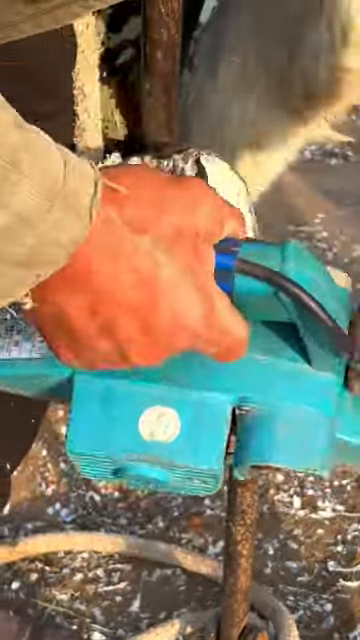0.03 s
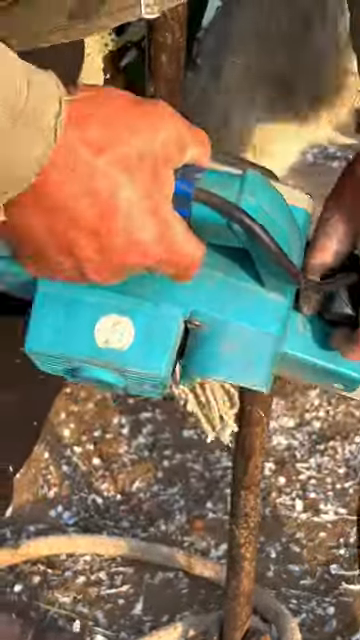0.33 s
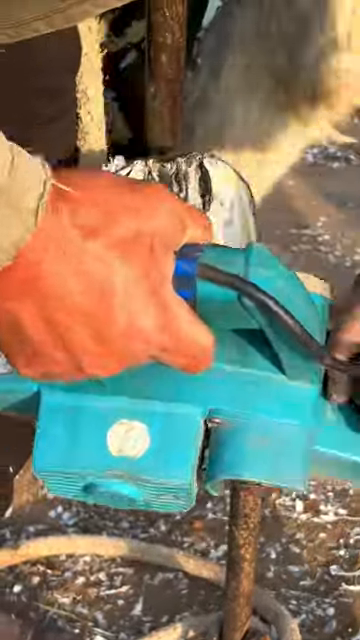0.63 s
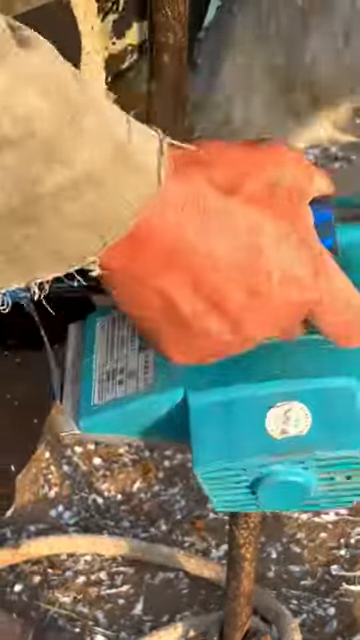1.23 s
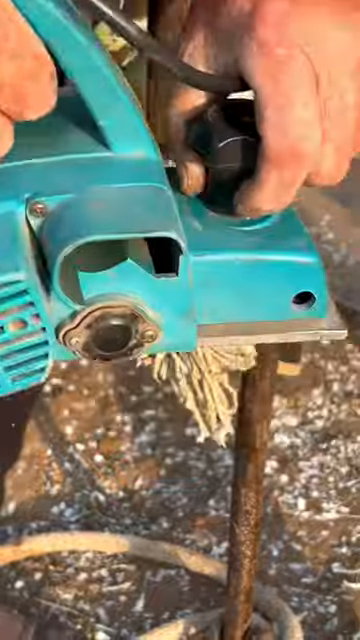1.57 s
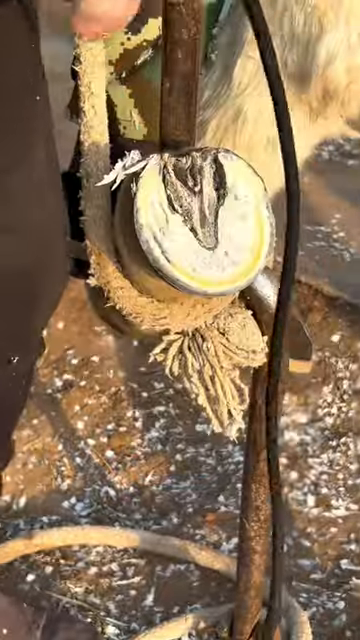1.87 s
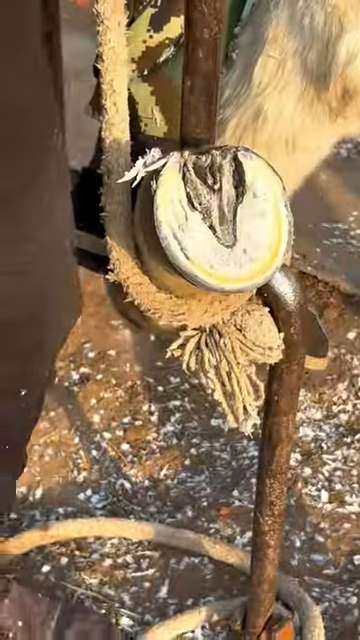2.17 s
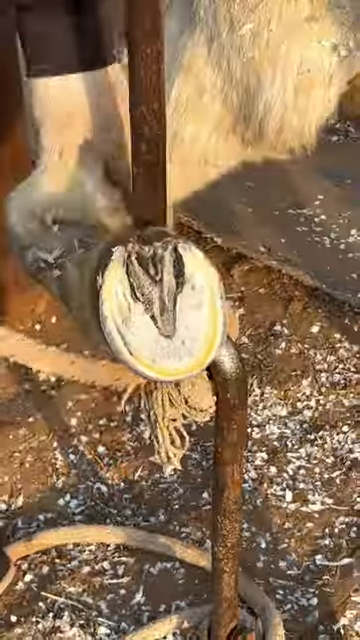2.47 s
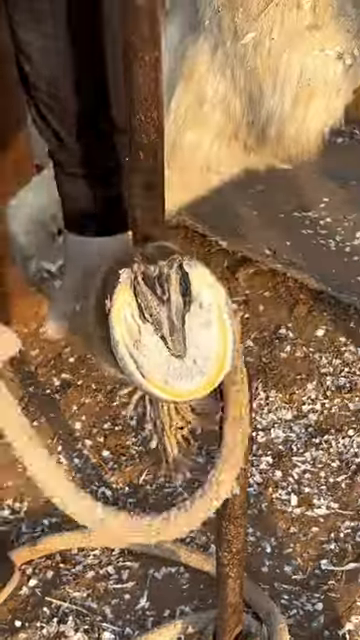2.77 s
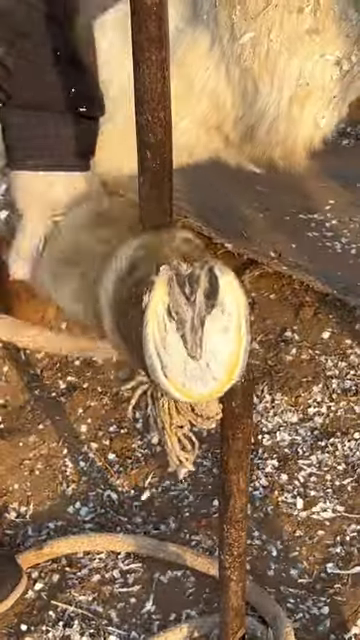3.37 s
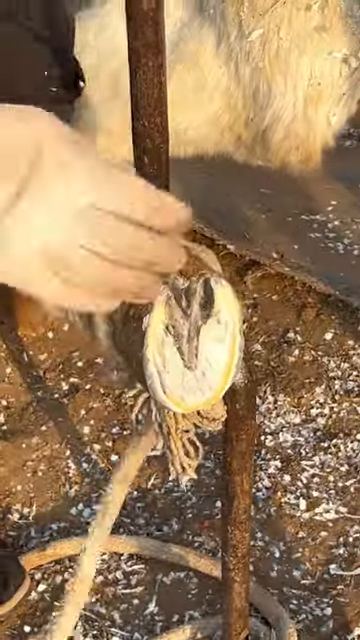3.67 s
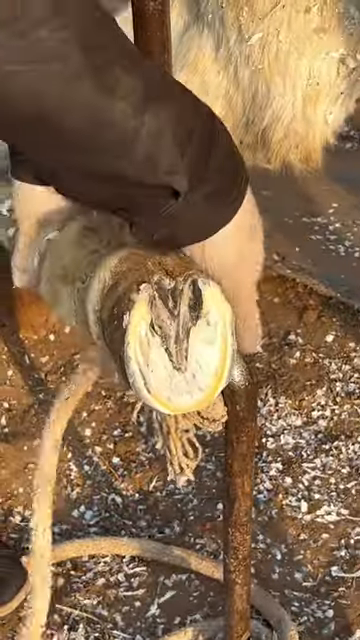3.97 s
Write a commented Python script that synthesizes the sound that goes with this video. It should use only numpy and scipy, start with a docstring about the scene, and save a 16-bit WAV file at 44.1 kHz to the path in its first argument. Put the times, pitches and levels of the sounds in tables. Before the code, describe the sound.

An electric planer whines, bites a hoof twice and cuts off, leaving wind buffeting the microphone.

```python
"""An electric hand planer runs close by, its blades chopping the air over the whistle of its fan, while
wind buffets the microphone throughout. Twice the blades bite into a hoof, and each load slows the drum.
Lifted clear, the planer speeds up, then coasts until its sound cuts off. In the quiet yard a small bird
peeps far away, a rope rubs as it is handled, and a steel fitting clanks and rings."""
import sys
import numpy as np
from scipy import signal
from scipy.fft import rfft, irfft, next_fast_len
from scipy.io import wavfile
from scipy.ndimage import map_coordinates

SR = 44100
rng = np.random.default_rng(int(sys.argv[2]) if len(sys.argv) > 2 else 0)


def store_pcm(level_fs):
    """Save levels as 16-bit WAV."""
    pcm = np.round(np.clip(level_fs, -1, 1) * 32767).astype(np.int16)
    wavfile.write(sys.argv[1], SR, np.atleast_2d(pcm).T)


N = 176400

# Speed of the cutter drum. Each row: time in seconds, blade rate in Hz.
BLADE_RATE = [(0, 443.5), (.16, 462.4), (.36, 475), (.42, 431), (.58, 460.2), (.8, 479), (.985, 487.3),
              (1.03, 427.8), (1.27, 469.3), (1.6, 490), (1.8, 495), (2, 471.9), (2.44, 417)]
# The planer turned in the hands. Each row: time in seconds, then blade tone, overtones, rush, hiss in dB.
PLANER_LEVELS = [(0, -31, -33, -29.5, -30.5), (.3, -34.5, -25.5, -30.5, -28.5),
                 (.46, -27.5, -33.5, -29.5, -29.5), (.93, -36, -24.5, -29, -28.5),
                 (1.08, -30, -34, -30, -32), (1.48, -28, -27, -27, -27), (1.78, -24.5, -27.5, -27, -23.5),
                 (2, -32, -28, -33, -28), (2.25, -38, -39, -39, -33), (2.44, -50, -40.5, -39.5, -35.5)]
# Drum and belt overtones. Each row: multiple of the blade rate, relative level in dB, roughness 0 to 1.
OVERTONES = [(1.5, -16, 0.8), (2, -6, 0.4), (2.33, -13.5, .8), (2.55, -17.5, 0.2), (2.82, -15.5, .4),
             (3, -3.5, 0.4), (3.5, -20.5, 0.4), (4, -15, 0.05), (5, -20.5, 0.2), (6.94, -16, 0.2)]
# The motor fan's whistle. Each row: time in seconds, frequency in Hz, level in dB.
FAN_WHISTLE = [(0, 5360, -37), (1.1, 5420, -42), (1.3, 5483, -28), (1.78, 5568, -28), (2, 5205, -37),
               (2.44, 4650, -44)]
# Air noise of drum, fan and chip port. Each row: frequency in Hz, relative density in dB.
RUSH_SPECTRUM = [(100, -78), (400, 3), (780, 0), (1100, 2), (1450, 4), (2500, -4), (3100, -7.5),
                 (3700, -12), (6000, -16.5)]
FAN_SPECTRUM = [(1500, -21.5), (3000, 0), (3900, 1), (5400, 1), (8000, -5.5), (11000, -8), (13800, -7),
                (15800, -33.5)]
PORT_SPECTRUM = [(2000, -45), (4100, -6), (4650, 15.5), (6300, -6.5), (15000, -51.5)]
# Strength of the wind's rumble. Each row: time in seconds, level in dB.
RUMBLE_LEVELS = [(0, -59.5), (.35, -39.5), (.7, -46), (1.9, -35), (2.65, -31.5), (3.1, -29.5),
                 (3.35, -42.5), (3.4, -30.5), (3.57, -29.5), (3.72, -54.5), (3.8, -35.5), (3.88, -48),
                 (3.99, -35)]
# Gusts. Each row: centre in seconds, half length in seconds, level in dB.
WIND_GUSTS = [(2.264, 0.33, -38.5), (2.479, 0.0089, -28), (2.515, 0.023, -31), (2.597, 0.021, -28.5),
              (2.642, .01, -32), (2.743, 0.022, -38), (2.787, 0.02, -30.5), (2.849, 0.034, -28.5),
              (2.946, .009, -24.5), (3.013, 0.022, -26), (3.071, 0.042, -31), (3.209, 0.0085, -35.5),
              (3.398, 0.013, -34), (3.437, 0.017, -30.5), (3.526, 0.041, -31.5), (3.621, 0.01, -37.5),
              (3.931, .009, -33.5)]
# Low thumps of wind. Each row: centre in seconds, level in dB, frequency in Hz.
WIND_THUMPS = [(2.472, -17, 130), (2.892, -24, 100), (3.969, -26, 83.5)]
# Wind and background noise. Each row: frequency in Hz, relative density in dB.
RUMBLE_SPECTRUM = [(22, -36.5), (50, 1), (180, 0.5), (290, -5), (420, -25.5), (2000, -79)]
FLUTTER_SPECTRUM = [(120, -19), (280, 2.5), (450, 0.5), (850, -13.5), (1200, -32), (4000, -92.5)]
YARD_SPECTRUM = [(60, 10), (1200, 0), (2700, -6.5), (3600, -8), (5500, -13), (15000, -20)]
FAR_HISS_SPECTRUM = [(2600, -1), (3500, 7.5), (8000, -12)]
# Blade contacts, three in the first bite. Each row: start in seconds, length in seconds, level in dB.
HOOF_CONTACTS = [(0.352, .022, -30), (0.38, 0.009, -20.3), (0.393, 0.012, -26), (0.994, .026, -14.7)]
# Modes of hoof and planer sole. Each row: frequency in Hz, relative level in dB.
HOOF_MODES = [(1380, 3), (1580, 1), (1780, -2), (2230, -4.5), (2760, -4), (3100, 2)]
# The bird's peeps. Each row: centre in seconds, level in dB, centre frequency in Hz.
BIRD_PEEPS = [(2.475, -54, 8050), (2.56, -55.5, 7800), (2.66, -58.5, 7650), (2.76, -57.5, 8000),
              (2.895, -60, 8150)]
# Rubs of rope and sleeve. Each row: centre in seconds, half length in seconds, level in dB.
ROPE_RUBS = [(3.141, 0.014, -52.5), (3.249, 0.037, -44), (3.42, 0.02, -56.5), (3.57, 0.022, -57.5),
             (3.669, 0.0082, -48), (3.952, 0.039, -49)]
# Impacts of the fitting. Each row: start in seconds, relative level in dB.
STEEL_IMPACTS = [(3.251, -26.5), (3.258, -19.5), (3.265, -18)]
# Modes of the fitting. Each row: frequency in Hz, relative level in dB, time to fall 60 dB in seconds.
STEEL_MODES = [(1940, -9, 0.07), (2670, 4.5, 0.047), (3384, 4.5, 0.031), (4260, 9.5, 0.026),
               (6350, -9.5, 0.14), (7000, -13, .07), (8240, -16, 0.16), (11150, -27, 0.29),
               (12790, -33, 0.29)]
# Noise of torn hoof, rubbed rope and struck steel. Each row: frequency in Hz, relative density in dB.
CHIP_SPECTRUM = [(300, -21.5), (1300, -5), (3200, -10.5), (4900, -1), (7500, 0), (15800, -16)]
RUB_SPECTRUM = [(300, 14), (900, 8.5), (4200, 3), (7000, -3), (15800, -17)]
CRACK_SPECTRUM = [(300, -19), (2000, -0.5), (4400, -5.5), (6000, -7), (15000, -38.5)]
# Phase between the microphones. Each row: frequency in Hz, lead of the left in radians.
LEFT_LEAD = [(0, 0), (300, -.4), (1400, -.25), (2000, .5), (2600, 2.1), (3700, .9), (4900, 1.4),
             (6000, 3.1), (16000, 17.6)]
# Their balance. Each row: frequency in Hz, left over right in dB.
LEFT_BALANCE = [(120, 0), (300, 1.1), (1400, 1.4), (2500, 0)]


def amp(db):
    """Amplitude ratio of a level in decibels."""
    return 10 ** (np.asarray(db) / 20)


def unit(x):
    """Normalisation to rms 1."""
    return x / np.sqrt(np.mean(x ** 2) + 1e-20)


def clock():
    """Time of each sample in seconds."""
    return np.arange(N) / SR


def along(points, hz):
    """Interpolation on a logarithmic frequency axis."""
    freqs, values = np.transpose(points)
    return np.interp(np.log(hz + 1), np.log(freqs + 1), values)


def curves(rows):
    """Linear interpolation in time of each column after the first."""
    times, *columns = np.transpose(rows)
    return [np.interp(clock(), times, column) for column in columns]


def wobble(rate):
    """A spline through random knots, rate of them a second."""
    knots = rng.standard_normal(8192)
    return map_coordinates(knots, [clock() * rate], mode="wrap")


def filtered(x, response):
    """Linear filtering: the spectrum of x times a frequency response."""
    size = next_fast_len(N + SR // 2)
    return irfft(rfft(x, size) * response(np.fft.rfftfreq(size, 1 / SR)), size)[..., :N]


def coloured(x, spectrum):
    """Spectral shaping of x, at rms 1."""
    return unit(filtered(x, lambda hz: amp(along(spectrum, hz))))


def noise(spectrum):
    """Coloured Gaussian noise of rms 1."""
    return coloured(rng.standard_normal(N), spectrum)


def swell(centre, half_length):
    """A Gaussian envelope in time."""
    return np.exp(-((clock() - centre) / half_length) ** 2)


def tone(cycles, rough, rate):
    """Random modulation spreads the rough share of a tone into a narrow band."""
    flutter = (wobble(rate) + 1j * wobble(rate)) / np.sqrt(2)
    envelope = np.sqrt(1 - rough ** 2) + rough * flutter
    return np.sqrt(2) * np.real(envelope * np.exp(2j * np.pi * (cycles + rng.random())))


def mode(t, hz, db, t60):
    """Free vibration: a sinusoid that decays 60 dB in t60 seconds."""
    return amp(db - 60 * t / t60) * np.sin(2 * np.pi * (hz * t + rng.random()))


def planer(passes):
    """Periodic blade passage radiates tones and modulates the air noise; the motor fan whistles."""
    blade_db, overtones_db, rush_db, hiss_db = curves(PLANER_LEVELS)
    drum_gain = amp(blade_db + 0.78 * wobble(22))
    blade_tone = tone(passes, rough=.2, rate=78)
    hum = amp(-21) * tone(passes / 2, rough=0.31, rate=29)  # two blades pass in each turn
    overtones = sum(amp(db) * tone(order * passes, rough, rate=60) for order, db, rough in OVERTONES)
    chop_db = 1.7 * np.cos(2 * np.pi * passes) + 1.3 * np.cos(np.pi * passes) + .9 * wobble(130)
    air = amp(rush_db) * noise(RUSH_SPECTRUM) + amp(hiss_db) * noise(FAN_SPECTRUM)
    air += amp(-25) * swell(1.706, 0.33) * noise(PORT_SPECTRUM)  # the chip port faces the microphone
    whistle_hz, whistle_db = curves(FAN_WHISTLE)
    whistle = amp(whistle_db) * tone(np.cumsum(whistle_hz) / SR, rough=0.62, rate=80)
    drum = drum_gain * (blade_tone + hum) + amp(overtones_db) * overtones
    return drum + unit(amp(chop_db)) * air + whistle


def wind():
    """Turbulent pressure at the microphones makes a lumpy rumble, crackly gusts and low thumps."""
    rumble_db, = curves(RUMBLE_LEVELS)
    common = noise(RUMBLE_SPECTRUM)
    side = amp(-15.5) * np.array([[1], [-1]]) * noise(RUMBLE_SPECTRUM)
    rumble = amp(rumble_db) * unit(amp(2.5 * wobble(36)) * (common + side))
    gust_power = sum((amp(db) * swell(s, width)) ** 2 for s, width, db in WIND_GUSTS)
    flutter_gain = np.sqrt(amp(rumble_db - 12) ** 2 + gust_power)
    crackle = amp(4 * wobble(300)) * rng.standard_normal(N)
    thumps = sum(amp(db) * swell(s, 0.92 / hz) * np.cos(2 * np.pi * hz * (clock() - s))
                 for s, db, hz in WIND_THUMPS)
    return rumble + flutter_gain * coloured(crackle, FLUTTER_SPECTRUM) + thumps


def yard():
    """Superposition of an outdoor noise floor, a far hiss that swells and fades, and a faint whine."""
    far_hiss = amp(-62) * swell(2.58, 0.28) * noise(FAR_HISS_SPECTRUM)
    floor = amp(-59.5) * noise(YARD_SPECTRUM)
    whine = amp(-72.5) * tone(1249 * clock(), rough=.4, rate=62)
    return floor + far_hiss + whine


def bites(passes, attack_s=0.01, release_s=0.0081):
    """Impulse excitation: each blade strikes the hoof, rings its modes and tears off a crackling chip."""
    t = clock()
    uneven_passes = np.maximum.accumulate(passes + .022 * wobble(450))
    blade = uneven_passes.astype(int)
    force = amp(2 * rng.standard_normal(4096))[blade]
    impulses = np.diff(blade, prepend=0) * force
    ring = sum(mode(t, hz, db, t60=.02) for hz, db in HOOF_MODES)
    strikes = unit(signal.fftconvolve(impulses, ring)[:N])
    tearing = force * np.exp(-(uneven_passes % 1))
    chips = coloured(tearing * rng.standard_normal(N), CHIP_SPECTRUM)
    contact = np.zeros(N)
    for start, length, db in HOOF_CONTACTS:
        rise = np.minimum(t - start, 0) / attack_s
        fall = np.maximum(t - start - length, 0) / release_s
        contact += amp(db) * np.exp(rise - fall)
    return contact * (strikes + amp(-5.5) * chips)


def bird(fall_hz_per_s=9200, half_length_s=0.017):
    """Each thin peep is a linear downward chirp, blurred by distance."""
    t, peeps = clock(), np.zeros(N)
    for centre, db, hz in BIRD_PEEPS:
        cycles = hz * t - fall_hz_per_s * (t - centre) ** 2 / 2
        peeps += amp(db) * swell(centre, half_length_s) * tone(cycles, rough=0.82, rate=1600)
    return peeps


def rope():
    """Sliding friction of rope and sleeve gives bursts of grainy noise."""
    rubs = sum(amp(db) * swell(s, width) for s, width, db in ROPE_RUBS)
    grain = amp(1.7 * wobble(430))
    return rubs * unit(grain * noise(RUB_SPECTRUM))


def clank():
    """Quick impacts on a steel fitting each give a broadband crack and excite its damped modes."""
    out = np.zeros(N)
    for start, db in STEEL_IMPACTS:
        t = np.maximum(clock() - start, 0)
        ring = sum(mode(t, hz, level + rng.normal(0, 3.8), t60) for hz, level, t60 in STEEL_MODES)
        crack = (amp(-60 * t / 0.051) + amp(-8.5 - 60 * t / 0.2)) * noise(CRACK_SPECTRUM)
        attack = 1 - np.exp(-t / 0.001)
        out += amp(db) * attack * (amp(-6.0) * ring + amp(-9.5) * crack)
    return out


def scattering(x, t60, wet_db):
    """Diffuse reflection from ground and stall adds a separate short tail to each side."""
    t = np.arange(SR // 8) / SR
    tail = rng.standard_normal((2, len(t))) * amp(-60 * t / t60)
    tail /= np.linalg.norm(tail[0])
    return x + amp(wet_db) * signal.fftconvolve(x[None], tail, axes=1)[:, :N]


def scene(cut_s=2.445, fade_s=.004):
    """Airborne sounds superpose and scatter; the wind acts directly on the microphones."""
    blade_hz, = curves(BLADE_RATE)
    passes = np.cumsum(blade_hz) / SR
    running = np.clip((cut_s - clock()) / fade_s + .5, 0, 1)
    airborne = running * (planer(passes) + bites(passes)) + clank() + rope() + bird() + yard()
    return scattering(airborne, t60=.04, wet_db=-16) + wind()


def record(dry):
    """Phase and level differences set the two microphones apart; both are band-limited."""
    sides, top_hz = np.array([[.5], [-.5]]), 15850

    def response(hz):
        phase = sides * np.interp(hz, *np.transpose(LEFT_LEAD))
        gain = amp(sides * along(LEFT_BALANCE, hz))
        return gain * np.exp(1j * phase) * (hz < top_hz)
    return filtered(dry, response)


dry = scene()
out = record(dry)
store_pcm(out)
```